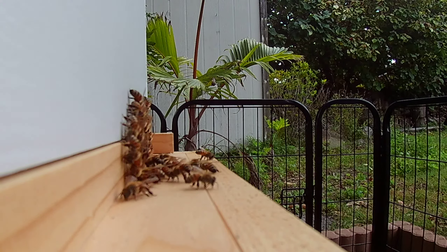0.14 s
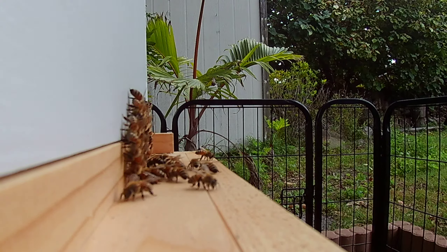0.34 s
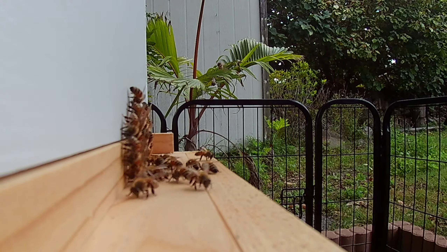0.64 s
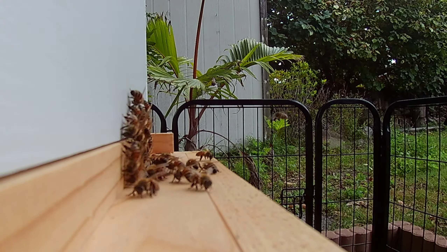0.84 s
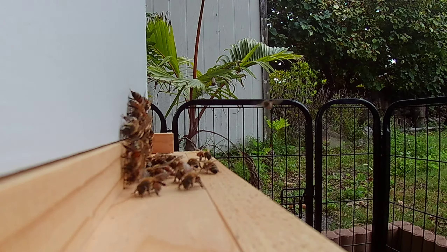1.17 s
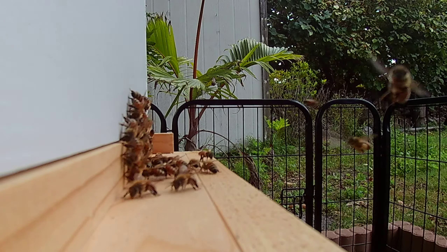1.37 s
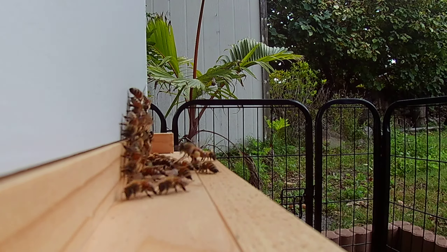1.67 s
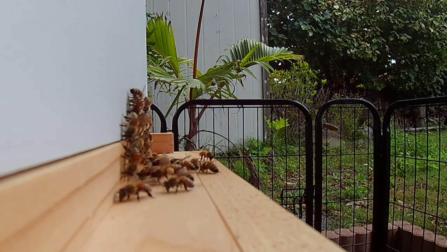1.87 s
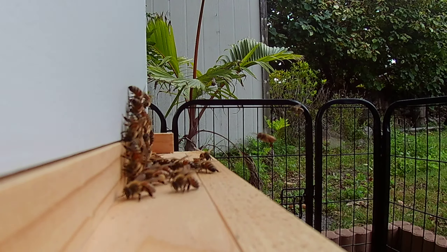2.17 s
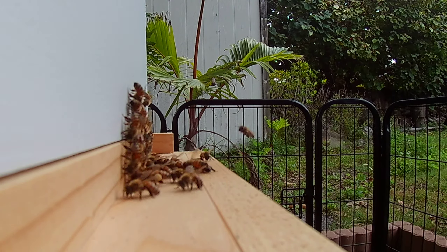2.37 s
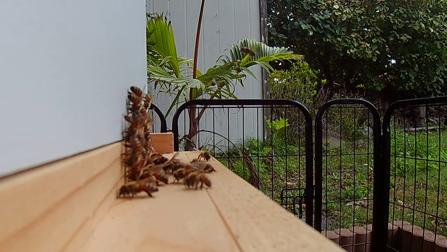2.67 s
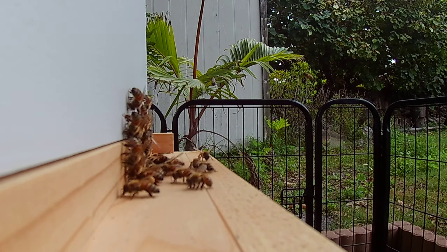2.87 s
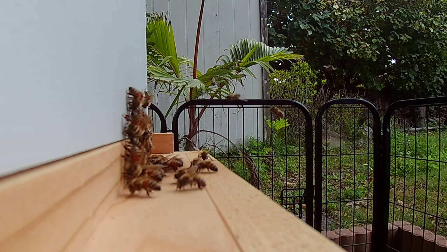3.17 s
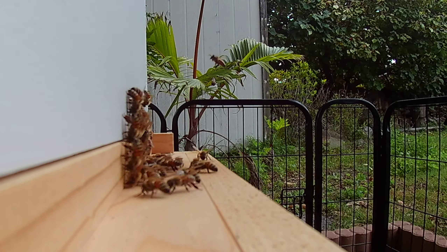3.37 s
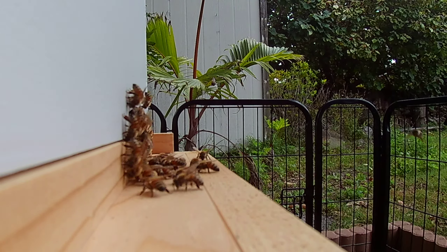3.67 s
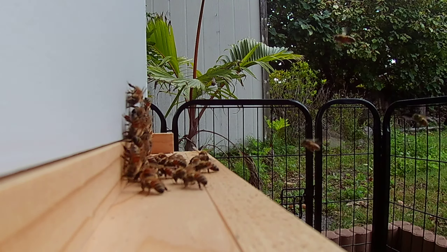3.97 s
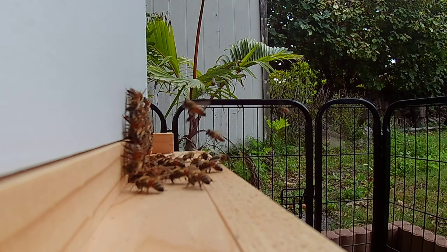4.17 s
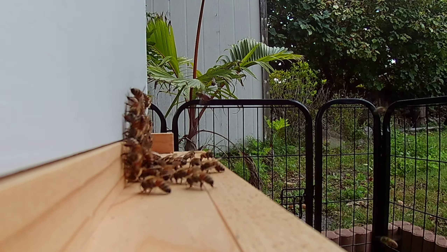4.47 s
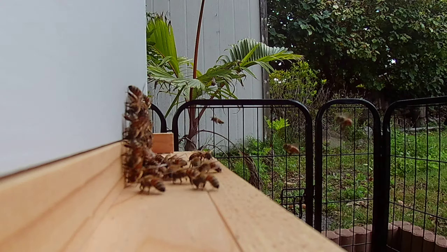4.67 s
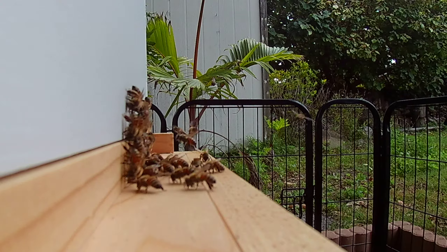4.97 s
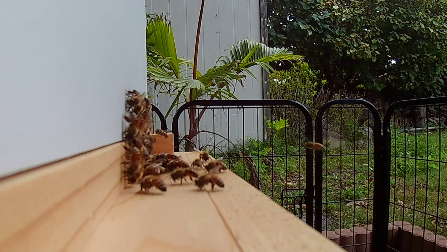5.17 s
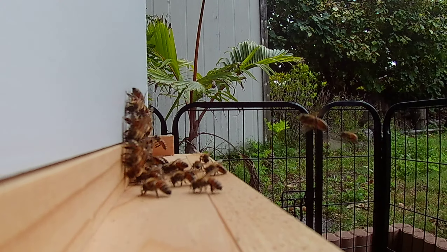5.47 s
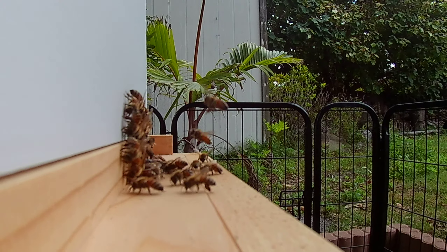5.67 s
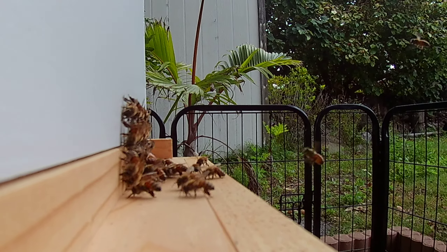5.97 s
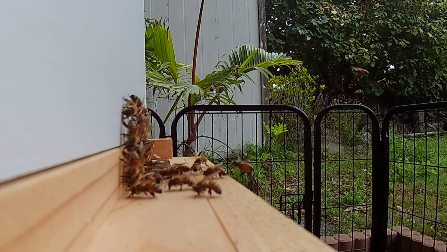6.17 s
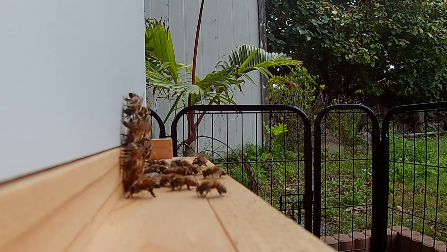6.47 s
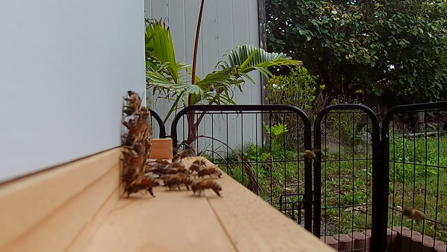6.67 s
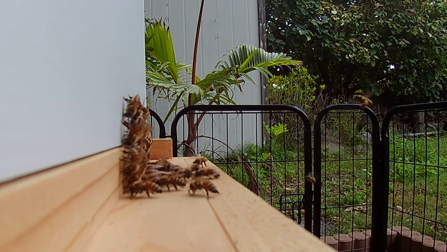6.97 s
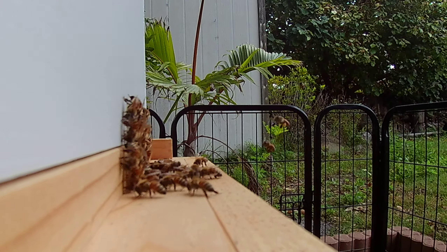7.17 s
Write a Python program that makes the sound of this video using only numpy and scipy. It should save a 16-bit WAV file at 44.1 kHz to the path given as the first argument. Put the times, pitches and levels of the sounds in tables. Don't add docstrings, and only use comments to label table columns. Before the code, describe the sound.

A quiet garden beside a beehive, heard from one small microphone on the entrance board. Throughout, dull distant traffic, slight low breeze and a thin steady hiss lie beneath a faint blended bee hum. For the first second little stands out. From about 1.1 s a bee hovers, and at 1.5 to 1.9 s close passes swell into strong, low, wavering drones, bending downward. A raspier bee hovers until 2.5 s. From 2.5 to 4.7 s softer fanning buzzes flutter, with brief passes; the hum thickens around 5 s. At 5.24 s light taps and scrabbling feet begin on the shell. A very loud, sharp, dry knock hits at 5.51 s, with small clicks after, then an equally hard but duller one at 5.74 s with scratchy ticks. Quick taps fade by 5.9 s. Afterwards bees pass slightly higher, quick slides around 6.7 and 6.9 s, one circling and buzzing until 7.3 s.

```python
import sys
import numpy as np
from scipy import signal
from scipy.fft import rfft, irfft
from scipy.io import wavfile
from scipy.ndimage import uniform_filter1d, minimum_filter1d

SR = 44100
rng = np.random.default_rng(int(sys.argv[2]) if len(sys.argv) > 2 else 0)


def ratio_of_db(decibels):
    return 10 ** (np.asarray(decibels, float) / 20)


def digitize_waveform(pressure):
    field = np.atleast_2d(pressure).T
    bounded = np.clip(field, -1, 1)
    quanta = np.round(bounded * 32767).astype(np.int16)
    wavfile.write(sys.argv[1], SR, quanta)


N = 323253

# (frequency [Hz], density [dB per Hz])
TRAFFIC_COLOUR = [(59, -28.5), (100, 0), (187, -6), (264, -4.5), (324, -9.5), (385, -5.5), (515, -10),
                  (640, -7.5), (1210, -8.5), (1510, -14.5), (1720, -18), (2230, -35), (3200, -33.5),
                  (4160, -67), (7040, -120)]
# (time [s], level [dB])
TRAFFIC_SWELL = [(0.0, -59.5), (.5, -60.5), (1.04, -58), (1.75, -58), (2.6, -59.5), (3.65, -60),
                 (3.92, -57), (4.67, -59.5), (4.98, -57), (5.3, -57.5), (5.98, -56.5), (6.15, -58.5),
                 (6.94, -57), (7.33, -56.5)]
# (frequency [Hz], density [dB per Hz])
WIND_COLOUR = [(8.8, -57), (15, -9.5), (65, 5.5), (92, -2.5), (122, -1), (151, -5), (225, -15), (250, -17),
               (320, -30.5), (550, -120)]
# (time [s], level [dB])
BREEZE_SWELL = [(0.0, -59), (1.04, -59.5), (1.75, -61), (2.59, -58), (5.0, -60), (5.41, -54.5),
                (5.98, -58.5), (6.15, -62), (6.72, -56.5), (7.33, -62)]
# (frequency [Hz], density [dB per Hz])
HISS_COLOUR = [(1060, -27), (1800, 1.5), (1940, -7), (2370, -5.5), (2900, -13), (3950, -7), (4660, -10),
               (5700, -9.5), (7450, -12), (7750, -22.5), (9680, -15.5), (10700, -18.5), (12600, -15.5),
               (13150, -8), (13600, -15.5), (15100, -15), (16000, -20)]
# (frequency [Hz], density [dB per Hz])
DRAUGHT_COLOUR = [(2500, -28), (4000, -11.5), (5500, 2), (7300, -7.5), (8200, -14.5), (9500, -6.5),
                  (11000, -29)]
# (time [s], level [dB], time near [s])
DRAUGHT_PUFFS = [(.06, -89, .015), (.72, -78, 0.033), (.87, -72.5, .015), (.96, -86, 0.022),
                 (1.15, -76, .07), (1.42, -81, 0.089), (1.71, -69, 0.12), (1.92, -76, 0.041),
                 (2.45, -76.5, .06), (2.63, -79, .1), (2.99, -79, 0.03), (3.25, -85.5, 0.11),
                 (4.05, -83, 0.05), (4.36, -73, 0.067), (4.6, -80.5, .05), (5.08, -72.5, 0.2),
                 (5.31, -74, .08), (5.81, -67.5, .05), (5.94, -68.5, 0.031), (6.2, -77.5, .12),
                 (6.42, -67, 0.029), (6.5, -73, .012), (6.75, -81.5, 0.087), (7.33, -70, 0.039)]
HISS_DB, DRAUGHT_STILL_DB = -72.5, -91.5
DRAUGHT_HZ, DRAUGHT_DEPTH = 205, 0.68

# (time [s], octave tone level [dB])
SWARM_SWELL = [(0, -73.5), (1.0, -74.5), (2.3, -71.5), (3.2, -69.5), (3.6, -72), (4.1, -70), (4.9, -66),
               (5.4, -68.5), (6.3, -73.5), (7.33, -75)]
SWARM_BEATS = [208.6, 218.5, 231, 237.6, 195.7, 253, 270.3]

# (time [s], peak level [dB], frequency [Hz], scrape [ms])
FOOT_TICKS = [(.0538, -49, 4640, 1.2), (1.9051, -55, 3800, 3.1), (1.9659, -51, 4400, 1.5),
              (4.9055, -49.5, 6640, 0.69), (4.9037, -54.5, 11500, 1.4), (5.2896, -51, 9600, 3.0),
              (5.293, -56, 12400, 2.5), (5.7445, -34, 4040, 7), (5.745, -49, 5760, 9.9),
              (5.72, -46, 4000, 15), (5.725, -54, 13800, 9.0), (5.7255, -51, 6500, 6.0),
              (5.733, -54, 10200, 13), (5.747, -52, 13100, 5.4), (5.244, -48.5, 8800, 3.4),
              (5.878, -55.5, 4180, 0.93), (6.504, -49.5, 5300, 1.6)]

# (multiple of the beat [1], level [dB])
UPPER_WING_TONES = [(5, 2.5), (6, -6), (7, -8), (8, -17), (9, -18.5)]
# (beat [dB], octave [dB], third [dB], fourth [dB], buzz [dB])
FROM_ABOVE = (-1, -7, -14.5, -14, -17.5)
FROM_BESIDE = (-11.5, -0.5, -11.5, -12.5, -13)
FROM_BEHIND = (-8.5, -5.5, -6.5, -14.5, -0.5)
AT_A_SLANT = (-9, -5.5, -7.5, -1, -9)
# (closest time [s], level [dB], wing beat [Hz], glide [Hz per s], time near [s])
PASSES_ABOVE = [(1.07, -63.5, 223, 90, 0.088), (1.49, -50, 231, -210, 0.049),
                (1.64, -49.5, 222, -120, 0.046), (1.93, -51, 226, -30.5, .055),
                (2.62, -67.5, 226.6, -2, 0.048), (3.22, -62.5, 229.3, 32, 0.078),
                (3.41, -67, 237.5, 20, .07), (3.94, -65, 227.4, -2, .05), (4.08, -59, 231, 42, 0.035),
                (4.19, -60.5, 221.5, -25, .04), (4.62, -62.5, 196, 40.5, .07), (4.95, -62, 226, -41, 0.053),
                (5.655, -58, 241.7, 3.5, 0.05), (6.59, -59.5, 273, -55, 0.058),
                (6.77, -60.5, 263.8, 2.5, 0.081), (7.27, -58, 246.2, 38, .07)]
PASSES_BESIDE = [(4.7, -60, 201.3, 18, 0.049), (4.85, -60, 233.2, 3, 0.054), (5.09, -62.5, 266, 7.5, 0.081),
                 (5.655, -56.5, 241.8, 4, 0.052), (5.93, -63.5, 247.5, -33, .1),
                 (6.25, -63, 236.2, 6, 0.094), (6.55, -66, 247.5, 7.5, 0.055),
                 (6.69, -65.5, 263, -14, 0.042)]
PASSES_BEHIND = [(1.57, -61.5, 227, 401, 0.029), (1.71, -63, 212.2, -5.5, 0.075),
                 (5.95, -70, 243, -34, .06)]
PASSES_SLANTING = [(1.48, -63, 231, -150, .05), (1.62, -63, 223.6, -130, .04),
                   (1.83, -59.5, 212, 31.5, 0.054), (1.93, -63, 223.5, -1, .06), (2.36, -66, 215, 3, .04),
                   (6.715, -55, 251.3, -350, .02), (6.92, -60.5, 253, -350, .022),
                   (7.02, -69, 200.6, 102, 0.029), (7.2, -68, 247.3, 59.5, .06),
                   (2.63, -69, 228.5, -0.5, .05), (3.36, -61, 236, -3, .04), (4.9, -66, 229.3, 0, 0.049)]
# (time [s], wing beat [Hz], level [dB], turn [0 above, .5 beside, 1 behind], extra buzz [dB])
HOVERING = [(1.13, 214, -76, 0.83, 0), (1.19, 219, -70, 0.81, 5.5), (1.25, 235, -63, 0.83, 2),
            (1.3, 226.7, -64, 0.68, 1), (1.35, 226.2, -59, 0.66, 4), (1.44, 220, -71, 0.78, 0)]
LANDING_BEE = [(1.76, 210.5, -55, 0.68, -2), (1.819, 212.2, -56.5, 0.7, -4), (1.9, 218.3, -60, 0.59, -5),
               (1.99, 214.7, -55, 0.41, 4), (2.09, 210.9, -64, 0.32, -18), (2.19, 211, -55, 0.55, 2),
               (2.29, 208, -59.5, 0.55, -8), (2.379, 214.4, -63, 0.64, 1), (2.48, 221, -58, 0.47, -2)]
FANNING_BEE = [(2.46, 223.8, -66, .5, 0), (2.53, 230.1, -57.5, .5, 0.24), (2.6, 228, -73, 0.35, 0),
               (2.75, 230, -62, 0.58, 0), (2.95, 222, -65, 0.51, 0), (3.05, 224.2, -65.5, 0.46, 0),
               (3.18, 227.2, -58.5, 0.63, 2), (3.27, 223.6, -70, .4, 0), (3.4, 233, -63, .4, 0)]
SECOND_FANNING_BEE = [(3.48, 227.9, -69, 0.45, 0), (3.6, 230, -63.5, 0.68, 0), (3.75, 231.7, -70.5, .8, 0),
                      (3.93, 226.1, -64, 0.99, 0), (4.01, 224.9, -59, 0.69, 0), (4.2, 224, -73, .5, 0),
                      (4.36, 226.7, -62.5, .85, 0), (4.56, 224.4, -65.5, 0.68, 0),
                      (4.72, 234.4, -63, .5, 0)]
CIRCLING_BEE = [(6.6, 235, -70, 1, 3), (6.75, 247, -66, 0.98, 1), (6.82, 242, -62, 0.72, 1),
                (6.9, 252, -56.5, 0.58, 2.5), (7.02, 253.2, -60, 0.61, 3), (7.099, 231, -59.5, 0.82, 3),
                (7.17, 235.3, -60.5, 1, -3), (7.24, 251, -61, 1, -7), (7.35, 253, -59.5, 0.93, -4)]
# (waver [share of the beat], flutter [dB])
CALM_WINGS = (.004, 1.0)
FIDGETY_WINGS = (.016, 3.0)

# (time [s], peak level [dB], frequency
# [Hz], t60 [ms])
LIGHT_TAPS = [(5.239, -44, 1500, 8.7), (5.2375, -48, 2213, 6), (5.2386, -49, 4100, 13),
              (5.245, -32, 1140, 12), (5.2448, -43, 2000, 6), (5.2445, -48, 4140, 8), (5.278, -49, 1200, 9),
              (5.2907, -45, 1150, 14), (5.2955, -46, 1090, 14), (5.307, -51, 1250, 9),
              (5.317, -43, 1200, 9), (5.334, -46, 1240, 10), (5.355, -38.5, 1250, 7.4),
              (5.361, -44, 1300, 12), (5.3843, -51, 1350, 9), (5.3843, -43.5, 4020, 5.1),
              (5.246, -54, 5370, 9), (5.256, -59, 5570, 6), (5.291, -56, 4800, 6), (5.412, -52, 1200, 9),
              (5.426, -59.5, 4070, 6.5), (5.5139, -33, 9700, 4), (5.5172, -31, 9400, 4),
              (5.5170, -27, 5200, 5), (5.6958, -35, 1340, 6.8), (5.7117, -46, 6840, 3.2),
              (5.738, -34, 3740, 6), (5.7462, -35, 3700, 7), (5.749, -36.5, 4160, 6.4),
              (5.7513, -35, 3770, 6.5), (5.7512, -39, 4770, 7), (5.7536, -38, 4180, 7),
              (5.7535, -50, 6100, 5.5), (5.7598, -48, 4950, 6.5), (5.7645, -57, 6100, 10),
              (5.770, -57, 4330, 7.4), (5.796, -55, 5500, 5.1), (5.8025, -57, 5300, 8),
              (1.9062, -59, 6340, 5), (1.9662, -53, 6240, 4),
              (5.541, -46, 3740, 110), (5.55, -54, 4600, 6), (5.238, -42, 1000, 10), (5.252, -47, 1950, 9.2),
             (5.7435, -36, 2140, 7), (5.578, -44, 120, 45), (5.772, -41, 180, 25), (5, -40.5, 150, 25),
             (5, -43, 150, 22), (5.276, -49, 940, 12), (5.361, -41, 950, 13), (5.385, -44, 1100, 10),
             (5.389, -49, 660, 11), (5.412, -51, 870, 12), (5.445, -47, 750, 12), (5.2965, -47, 1000, 14),
             (5.768, -41, 1050, 12), (6.4, -40, 1170, 15), (5.857, -46, 1447, 10), (5.578, -53, 12200, 5),
             (5.823, -55, 4200, 5), (5.839, -58, 4900, 5)]
# (start [s], end [s], level [dB])
SCRABBLES = [
    (5.236, 5.453, -62.5),
    (5.539, 5.598, -58.5),
    (5.779, 5.866, -57),
]

# (time [s], blow level [dB], contact [ms], sharp edge level [dB], push + or pull - [1])
SHELL_BUMPS = [
    (5.246, -38, 0.24, -16, 0.53),
    (5.5107, 3.5, 0.35, -1, 0.95),
    (5.5174, -25.5, 0.26, 3, 1),
    (5.56, -28, 0.34, -1, 0.54),
    (5.565, -31, 0.34, 1, 0.62),
    (5.578, -41, 0.24, 6.5, 0.88),
    (5.712, -24.5, 0.29, -5, -0.99),
    (5.7383, 3, 0.44, -50, -1.1),
]
# (frequency [Hz], level [dB], t60 [s])
BODY_MODES = [(151, -1.5, 0.012), (330, -14, 0.014), (586, -3, 0.011), (908, 3, 0.0058), (1280, 0.5, 0.01),
              (1570, -5.5, 0.013), (1795, 2, .012), (2150, -3.5, 0.01), (2400, -2.5, 0.0086)]
# (frequency [Hz], level [dB], t60 [s])
RIM_MODES = [(3095, 1.5, 0.0066), (3520, -3, 0.00983), (3770, 0, 0.0092), (4000, -4, 0.012),
             (5300, -1.5, .008), (6300, -12.5, .01), (7055, -15.5, 0.011), (7950, -16, .01),
             (9370, 2.5, 0.0036), (9930, -6, 0.0068), (10710, -10, 0.0074), (11400, -20, 0.0063),
             (12350, -20, 0.0076), (14200, -20, .008)]
BODY_TOP_HZ, FULL_DB = 2750, -1.2
# (frequency [Hz], level [dB], t60 [s])
LOOSE_MODES = [(390, -37.5, 0.31), (3700, -40, 0.12), (3770, -41, .11), (89, -32, .035)]
# (frequency [Hz], level [dB], t60 [s])
PANEL_MODES = [(165, -27.5, 0.028), (935, -17.5, .03), (1284, -12, .02)]
LOOSE_S, PANEL_S = 5.511, 5.5106

# (frequency [Hz], width [Hz])
KNOCK_NULLS = [(35.05, 31), (1087, 110), (3170, 170), (4540, 260), (4660, 150), (5900, 300), (8400, 850),
               (8100, 320), (8300, 400), (11080, 200), (13600, 500), (16100, 2200)]
# (frequency [Hz], width [Hz])
EMPTY_BANDS = [(6120, 120), (6760, 68), (7370, 170), (10080, 70), (10380, 80), (11600, 110), (12080, 70),
               (12660, 90), (13080, 160), (14700, 140), (15400, 200)]
# (frequency [Hz], share [1])
TONE_DROPS = [(1500, 0.14), (3000, 0.62), (6000, 1.005), (7500, 1.12), (11000, 1.52), (13000, 1.5),
              (15500, 1.5)]
# (frequency [Hz], share [1])
LOUD_TONE_DROPS = [(5600, 0.028), (5900, 0.65), (7900, 1), (8200, 1), (8500, 0.8), (8800, 0.097),
                   (10100, 0.011), (10400, 0.54), (15000, .4)]
TOP_HZ = 15750
BLOCK_S, BLOCK_START_S = 1024 / 48000, 5.4818


def curve(table):
    s, *columns = np.transpose(table)
    return [np.interp(np.arange(N) / SR, s, c) for c in columns]


def walk(rate):
    k = int(SR / rate)
    held = np.repeat(rng.standard_normal(N // k + 1), k)
    return 1.3 * uniform_filter1d(uniform_filter1d(held, k), k)[:N]


def coloured(colour, flicker_db, rate, count=6):
    hz, db = np.transpose(colour)
    f = np.log(np.maximum(np.fft.rfftfreq(N, 1 / SR), 1))
    spectrum = rfft(rng.standard_normal(N)) * ratio_of_db(np.interp(f, np.log(hz), db, -200, -200))
    centres = np.linspace(np.log(hz[0]), np.log(hz[-1]), count)
    out = np.zeros(N)
    for row in np.eye(count):
        band = irfft(spectrum * np.interp(f, centres, row), N)
        out += band * ratio_of_db(flicker_db * walk(rate))
    return out / np.std(out)


def near(t, closest_s, near_s):
    return 1 / (1 + ((t - closest_s) / near_s) ** 2)


def garden():
    t = np.arange(N) / SR
    traffic = ratio_of_db(curve(TRAFFIC_SWELL)[0] + 1) * coloured(TRAFFIC_COLOUR, flicker_db=1.2, rate=9, count=8)
    wind = ratio_of_db(curve(BREEZE_SWELL)[0]) * coloured(WIND_COLOUR, flicker_db=1.5, rate=9.8, count=4)
    hiss = ratio_of_db(HISS_DB + 2.5) * coloured(HISS_COLOUR, flicker_db=0.15, rate=20, count=8)
    gain = ratio_of_db(DRAUGHT_STILL_DB)
    for s, db, near_s in DRAUGHT_PUFFS:
        gain = gain + ratio_of_db(db - 2.5) * near(t, s, near_s) ** 2
    beat = np.cumsum(DRAUGHT_HZ * (1 + 0.012 * walk(9))) / SR
    gain = gain * (1 + DRAUGHT_DEPTH * np.cos(2 * np.pi * beat))
    draught = gain * coloured(DRAUGHT_COLOUR, flicker_db=2.0, rate=35, count=4)
    return traffic + wind + hiss + draught


def swarm(drift=.022, come_and_go_db=1.0):
    out = np.zeros(N)
    tone_levels = [(1, -4.5), (2, 0), (3, -7), (4, -10.5), (5, -8), (6, -12)]  # (multiple, dB)
    for hz in SWARM_BEATS:
        phase = 2 * np.pi * np.cumsum(hz * (1 + drift * walk(7))) / SR
        tones = sum(ratio_of_db(db) * np.sin(k * phase) for k, db in tone_levels)
        out += ratio_of_db(come_and_go_db * walk(6.7)) * tones
    return ratio_of_db(curve(SWARM_SWELL)[0] - 2.5) * out


def add(out, s, sound):
    i = int(s * SR)
    out[i:i + len(sound)] += sound[:len(out) - i]


def leak_start(s):
    return BLOCK_START_S + (np.floor((s + .001 - BLOCK_START_S) / BLOCK_S) - 1) * BLOCK_S


def smear(sound, smear_db, flatten):
    size = int(3 * BLOCK_S * SR)
    colour = uniform_filter1d(np.abs(rfft(sound[:size])), size=5) ** flatten
    leak = irfft(colour * rfft(rng.standard_normal(size)), size)
    leak = leak / np.std(leak) * np.std(sound[:size])
    return ratio_of_db(smear_db) * leak * signal.windows.tukey(size, .2)


def ticks(width=0.27):
    out = np.zeros(N)
    t = np.arange(3000) / SR
    for s, db, hz, ms in FOOT_TICKS:
        edges = (hz * (1 - width / 2), hz * (1 + width / 2))
        band = signal.butter(3, edges, "band", fs=SR, output="sos")
        puff = signal.sosfilt(band, rng.standard_normal(len(t)) * np.exp(-1000 * t / ms))
        puff = ratio_of_db(db) * puff / np.max(np.abs(puff))
        add(out, s, puff)
        add(out, leak_start(s), smear(puff, smear_db=-11, flatten=0.33))
    return out


def bee(air, t, hz, gain, side_db, waver=0.011, flutter_db=2.5, fade_s=0.035):
    wobble, flutter = air
    start = rng.random(10)
    at = (t * SR).astype(int) + int(start[0] * N)
    fade = np.clip(np.minimum(t - t[0], t[-1] - t) / fade_s, 0, 1)
    phase = 2 * np.pi * np.cumsum(hz * (1 + waver * wobble[at % N])) / SR
    *low_db, buzz_db = side_db
    tones = list(enumerate(low_db, 1))
    tones += [(k, buzz_db + db) for k, db in UPPER_WING_TONES]
    out = np.zeros(len(t))
    for k, db in tones:
        level = ratio_of_db(db + flutter_db * flutter[(at - 9000 * k) % N])
        out += level * np.sin(k * phase + 2 * np.pi * start[k])
    return np.sqrt(2) * fade * gain * out


def flights(reach=3.0):
    out = np.zeros(N)
    air = walk(25), walk(13)
    for passes, side_db in ((PASSES_ABOVE, FROM_ABOVE), (PASSES_BESIDE, FROM_BESIDE),
                            (PASSES_BEHIND, FROM_BEHIND), (PASSES_SLANTING, AT_A_SLANT)):
        for s, db, hz, glide, near_s in passes:
            t = np.arange(s - reach * near_s, s + reach * near_s, 1 / SR)
            add(out, t[0], bee(air, t, hz + glide * (t - s), ratio_of_db(db) * near(t, s, near_s), side_db))
    for flight, restless in ((HOVERING, CALM_WINGS), (LANDING_BEE, CALM_WINGS), (FANNING_BEE, FIDGETY_WINGS),
                             (SECOND_FANNING_BEE, FIDGETY_WINGS), (CIRCLING_BEE, CALM_WINGS)):
        s, *columns = np.transpose(flight)
        t = np.arange(s[0], s[-1], 1 / SR)
        hz, db, turn, buzz_db = (np.interp(t, s, c) for c in columns)
        sides = zip(FROM_ABOVE, FROM_BESIDE, FROM_BEHIND)
        side_db = [np.interp(turn, (0, .5, 1), tone) for tone in sides]
        side_db[4] = side_db[4] + buzz_db
        add(out, t[0], bee(air, t, hz, ratio_of_db(db), side_db, *restless))
    return out


def taps(rise_ms=.5):
    out = np.zeros(N)
    ms = np.arange(3000) / SR * 1000
    for s, db, hz, t60_ms in LIGHT_TAPS:
        decay = np.exp(-np.log(1000) * ms / t60_ms)
        tone = np.sin(2 * np.pi * hz * ms / 1000) * decay * (1 - np.exp(-ms / rise_ms)) ** 2
        tone = ratio_of_db(db) * tone / np.max(np.abs(tone))
        add(out, s - rise_ms / 1000, tone)
        add(out, leak_start(s), smear(tone, smear_db=-10, flatten=0.6))
    return out


def ring(modes, detune):
    t = np.arange(int(.3 * SR)) / SR
    out = np.zeros(len(t))
    for (hz, db, t60), d in zip(modes, detune):
        out += ratio_of_db(db) * np.sin(2 * np.pi * hz * d * t) * np.exp(-np.log(1000) * t / t60)
    return out


def scrabble(rate=450, spread_db=1.5):
    t = np.arange(N) / SR
    gain = sum(ratio_of_db(db) * ((t > a) & (t < b)) for a, b, db in SCRABBLES)
    size = ratio_of_db(spread_db * rng.exponential(size=N))
    steps = (rng.random(N) < rate / SR) * size * rng.choice([-1, 1], N)
    soft = np.diff(np.hanning(32))
    knock = np.convolve(ring(BODY_MODES[3:6], np.ones(3))[:2000], soft)
    return signal.fftconvolve(gain * steps, knock)[:N]


def bumps(scatter=0.012, release=0.38):
    out = np.zeros(N)
    padding = signal.ellip(6, 1, 45, BODY_TOP_HZ, fs=SR, output="sos")
    for s, blow_db, contact_ms, edge_db, sign in SHELL_BUMPS:
        detune = 1 + scatter * rng.standard_normal(len(BODY_MODES) + len(RIM_MODES))
        t = np.arange(-3 * contact_ms, 3 * contact_ms, 1000 / SR)
        push = np.exp(-(t / np.where(t < 0, contact_ms, release * contact_ms)) ** 2)
        body = np.convolve(ring(BODY_MODES, detune), np.diff(push))
        body = signal.sosfilt(padding, body)
        body = sign * ratio_of_db(min(blow_db, FULL_DB)) * body / np.max(np.abs(body))
        rim = ratio_of_db(blow_db + edge_db) * ring(RIM_MODES, detune[len(BODY_MODES):]) / 3
        rim = rim * (1 - np.exp(-np.arange(len(rim)) / SR / 0.00023)) ** 2
        add(out, s - 3 * contact_ms / 1000 - .00004, body)
        add(out, s - .0001, rim)
        leak = smear(body, smear_db=-18, flatten=0.54) + smear(rim, smear_db=-13.5, flatten=0.45)
        add(out, leak_start(s), leak)
    return out


def loose():
    out = np.zeros(N)
    add(out, LOOSE_S, ring(LOOSE_MODES, np.ones(len(LOOSE_MODES))))
    add(out, PANEL_S, -ring(PANEL_MODES, np.ones(len(PANEL_MODES))))
    return out


def port(x):
    for hz, width_hz in KNOCK_NULLS:
        x = signal.lfilter(*signal.iirnotch(hz, hz / width_hz, SR), x)
    for hz, width_hz in EMPTY_BANDS:
        x = signal.filtfilt(*signal.iirnotch(hz, hz / width_hz, SR), x)
    return x


def scene():
    surroundings = garden() + swarm()
    shell = ticks() + taps() + scrabble() + port(bumps()) + loose()
    return (surroundings + flights() + shell)[None]


def thin(x):
    size = 2 * int(BLOCK_S * SR)
    lead = -int(BLOCK_START_S * SR) % (size // 2)
    f, _, z = signal.stft(np.pad(x, (lead, 0)), SR, "cosine", size)
    band = np.sqrt(uniform_filter1d(np.abs(z) ** 2, size=24, axis=0))
    follow = np.interp(f, *np.transpose(LOUD_TONE_DROPS))[:, None]
    usual = np.maximum(np.median(band, axis=1)[:, None], follow * band)
    share = np.interp(f, *np.transpose(TONE_DROPS))[:, None]
    keep = (np.abs(z) > share * usual) & (f < TOP_HZ)[:, None]
    return signal.istft(z * keep, SR, "cosine", size)[1][lead:lead + N]


def ceiling(x, top=.96, hold_s=.004):
    k = int(hold_s * SR)
    gain = minimum_filter1d(np.minimum(1, top / (np.abs(x) + 1e-9)), 2 * k)
    return x * uniform_filter1d(gain, k)


def band_limit(x):
    return signal.sosfilt(signal.butter(12, 16450, fs=SR, output="sos"), x)


def record(dry):
    mix = ceiling(thin(dry[0]))[None]
    return band_limit(mix)


dry = scene()
out = record(dry)
digitize_waveform(out)
```